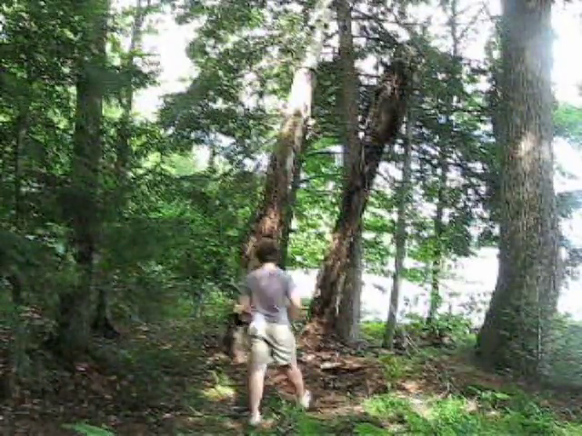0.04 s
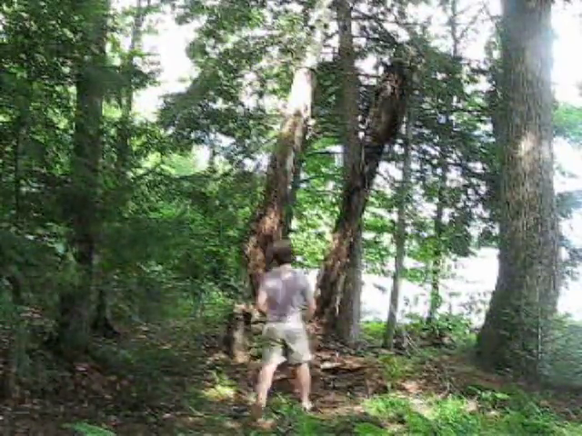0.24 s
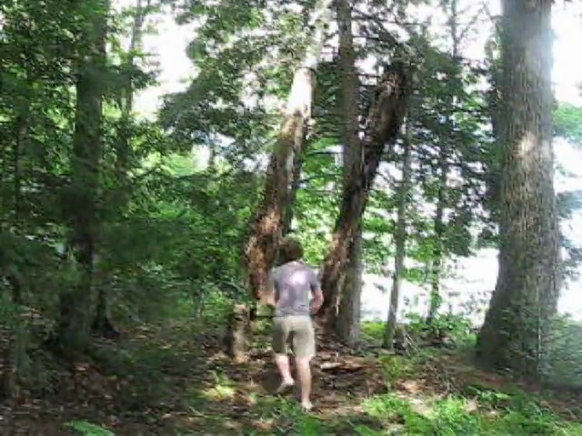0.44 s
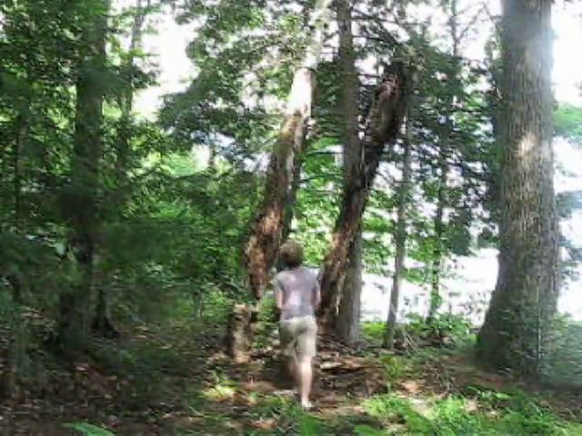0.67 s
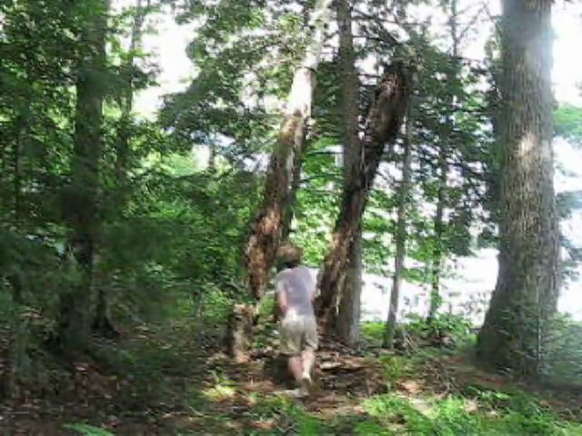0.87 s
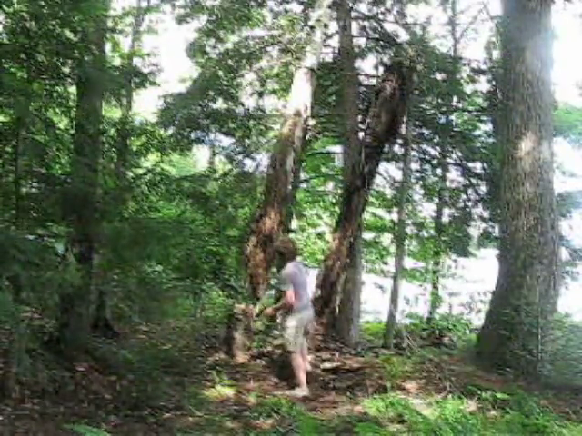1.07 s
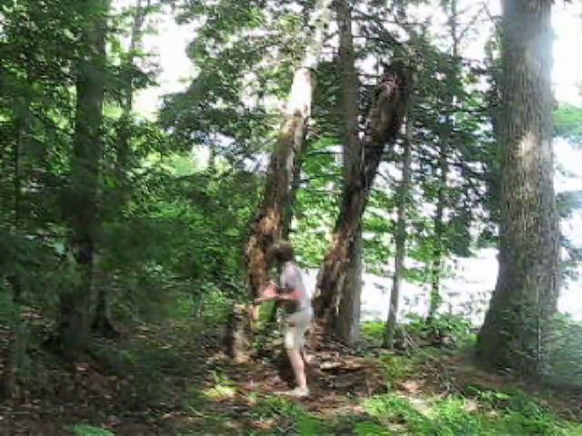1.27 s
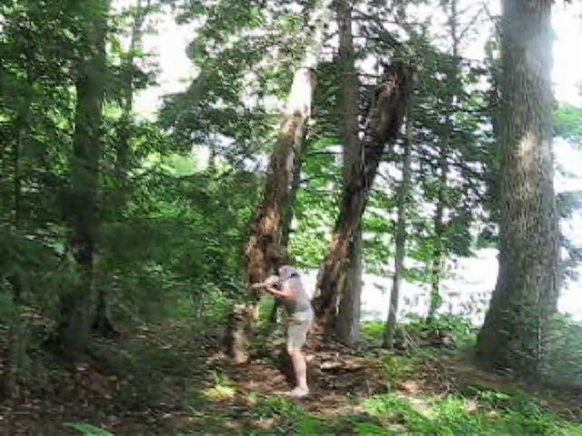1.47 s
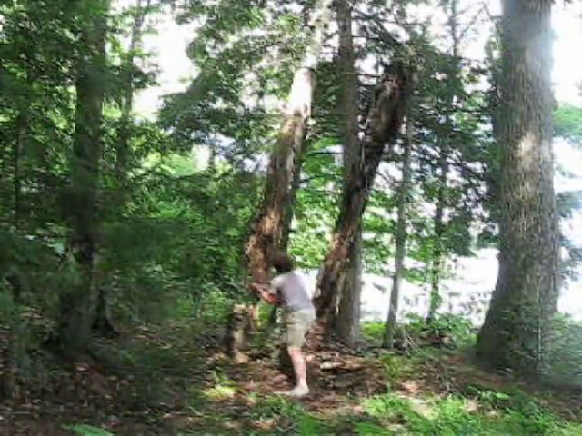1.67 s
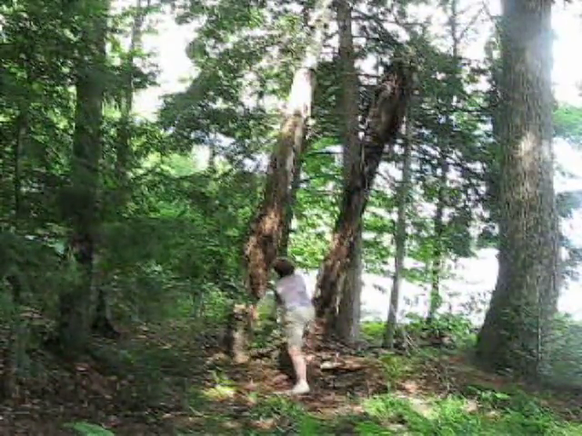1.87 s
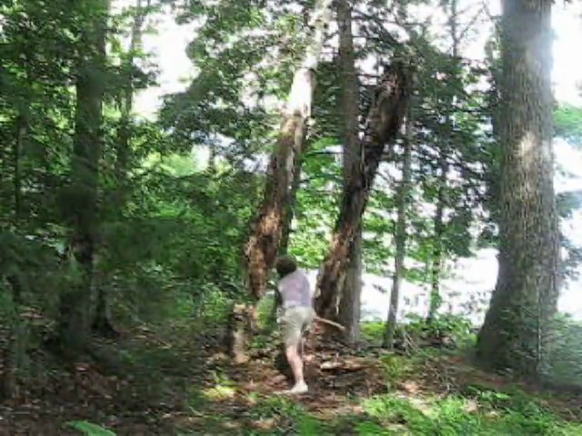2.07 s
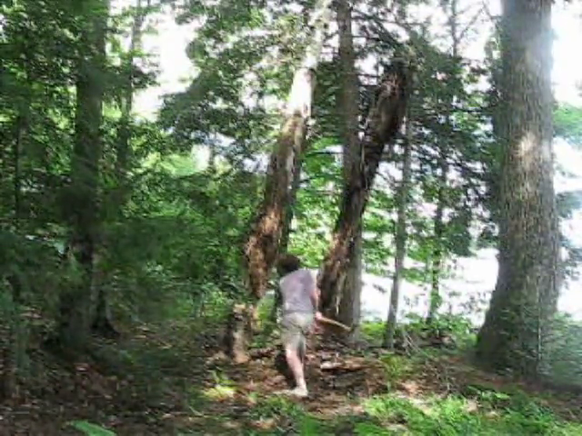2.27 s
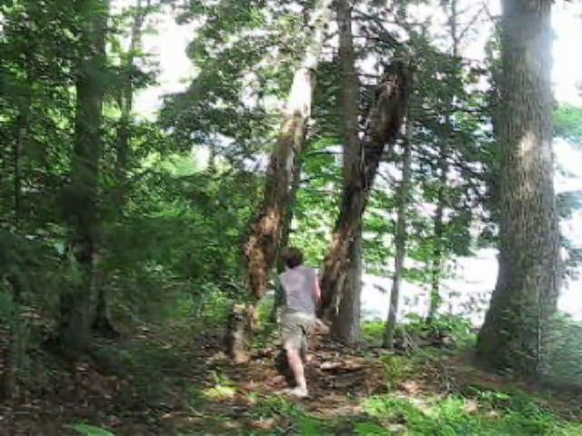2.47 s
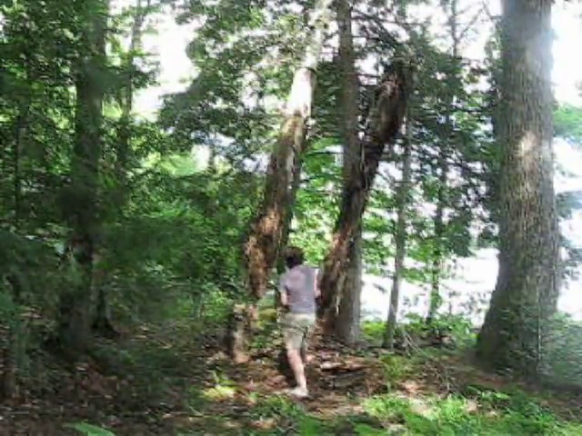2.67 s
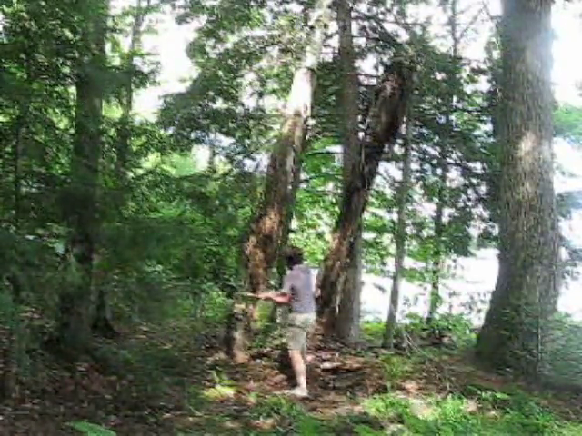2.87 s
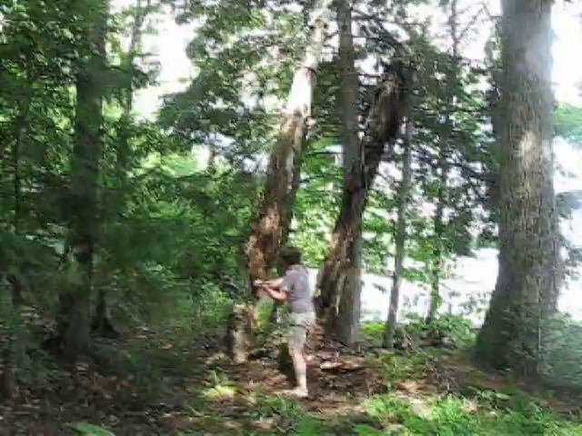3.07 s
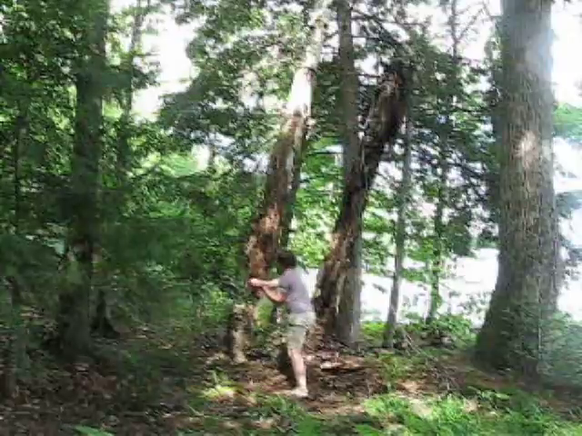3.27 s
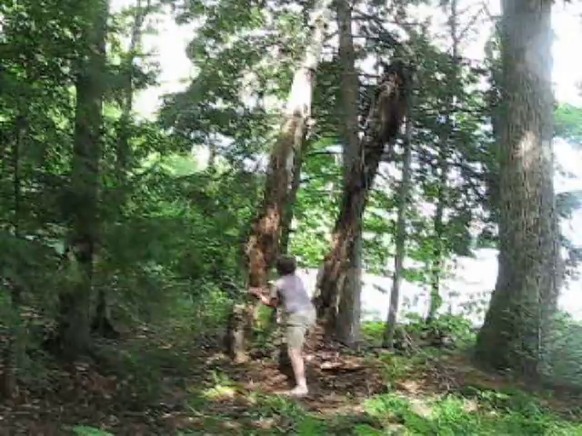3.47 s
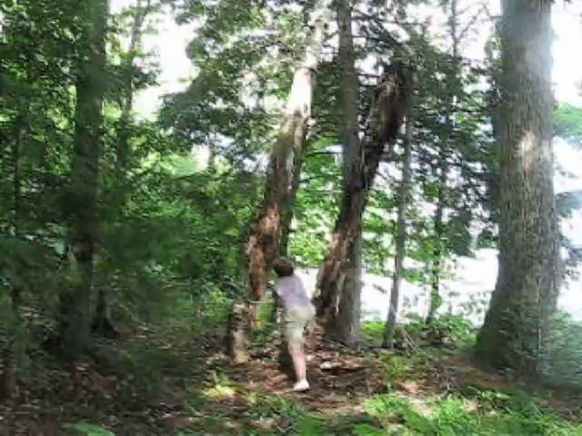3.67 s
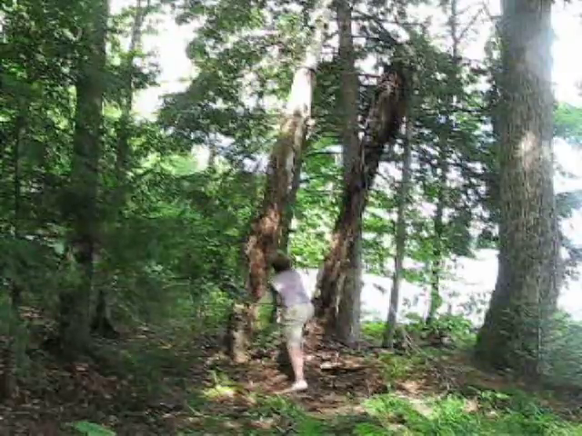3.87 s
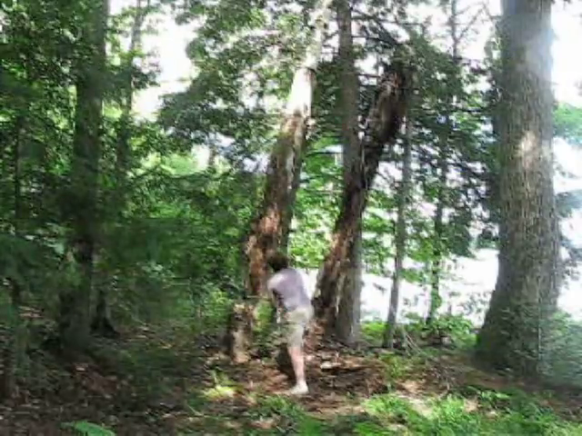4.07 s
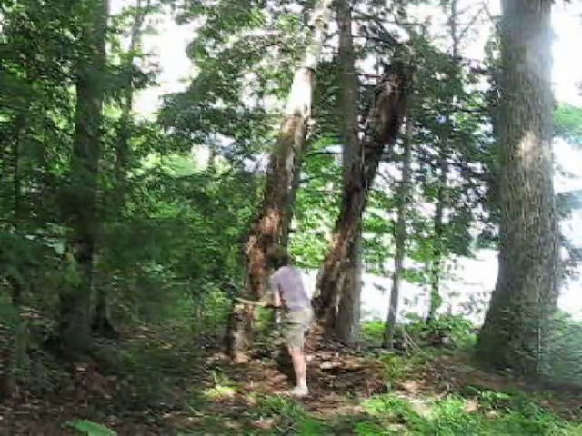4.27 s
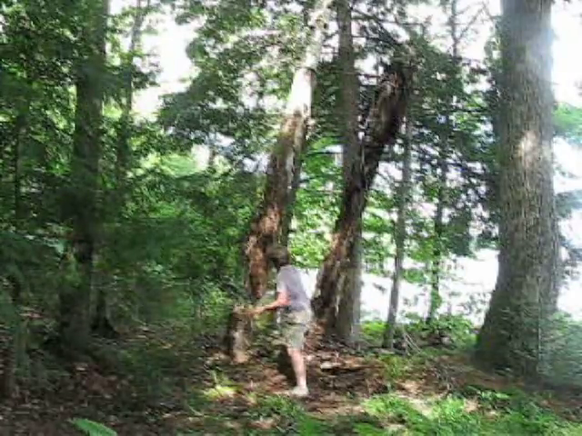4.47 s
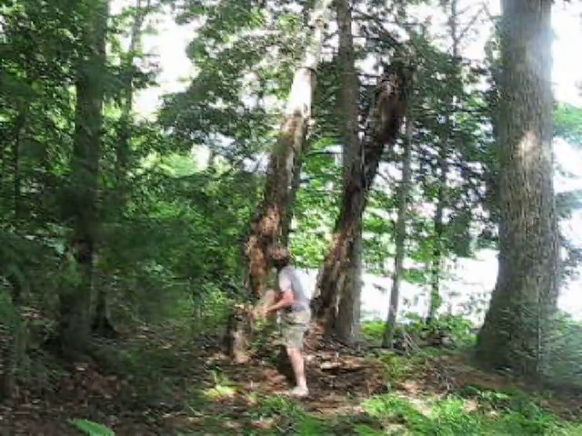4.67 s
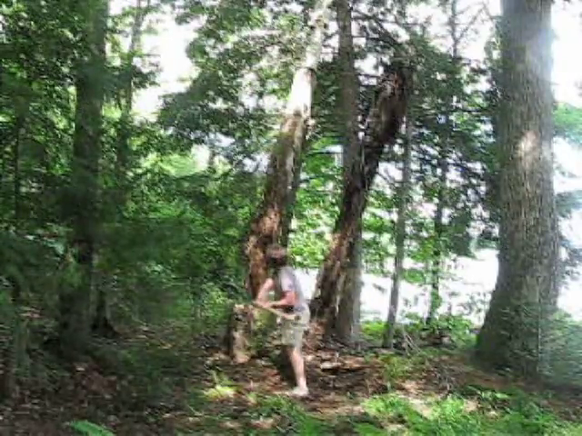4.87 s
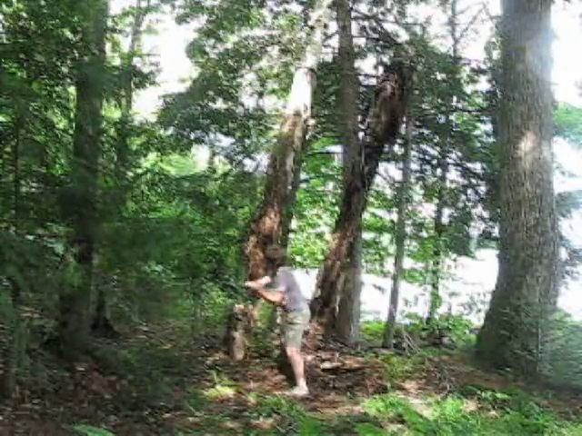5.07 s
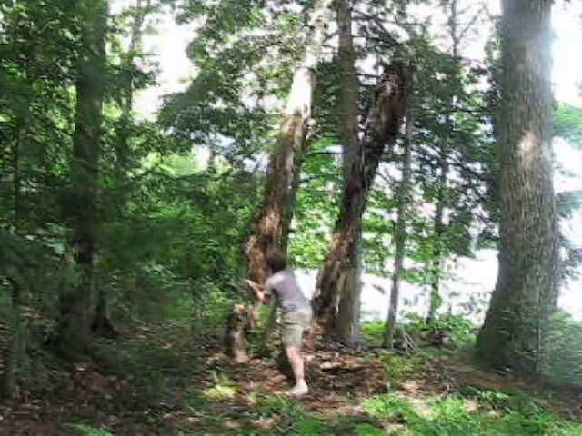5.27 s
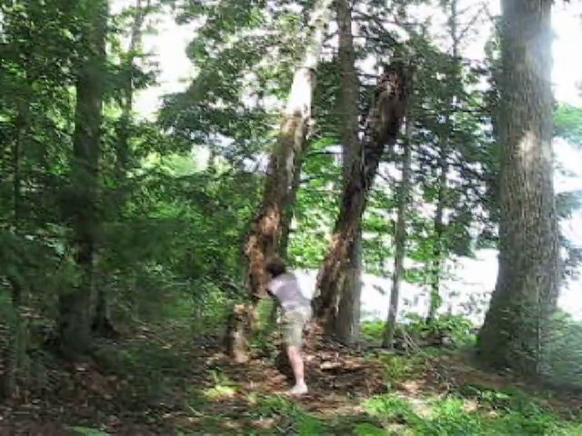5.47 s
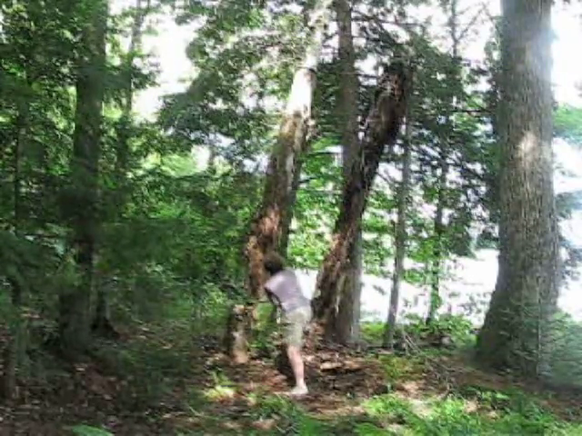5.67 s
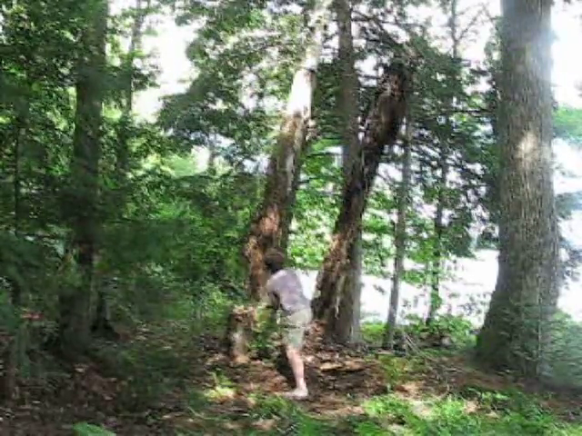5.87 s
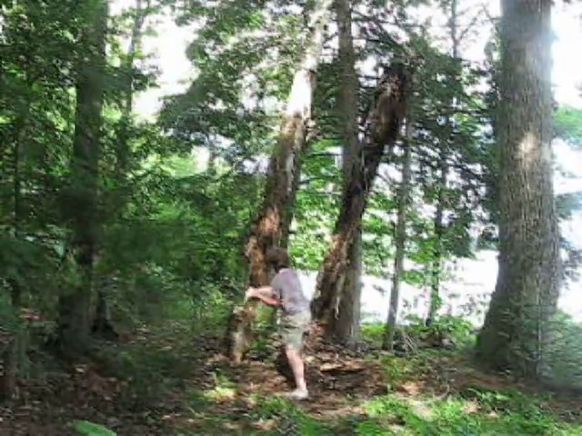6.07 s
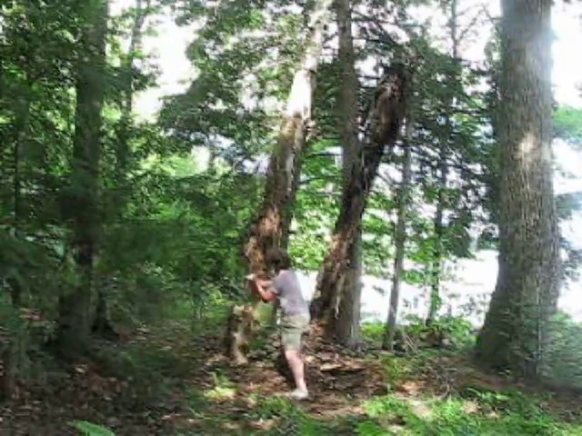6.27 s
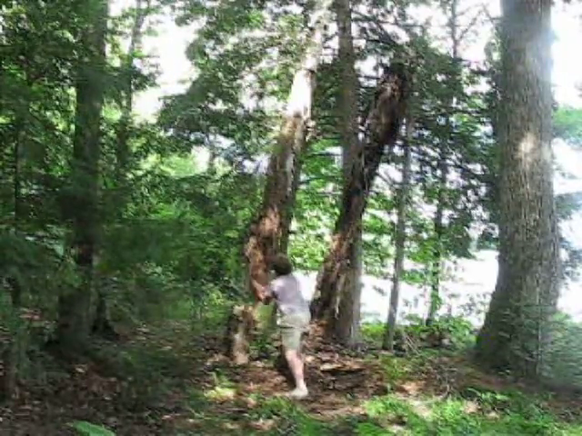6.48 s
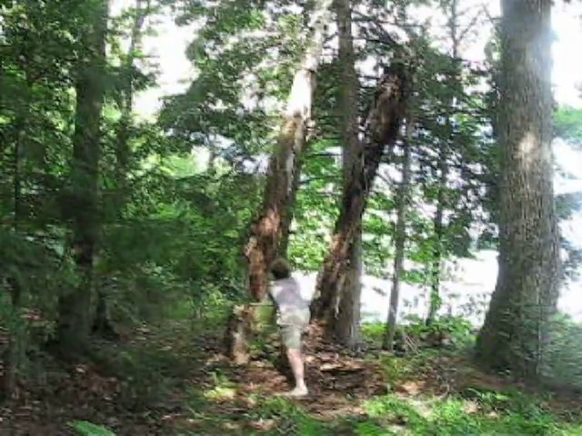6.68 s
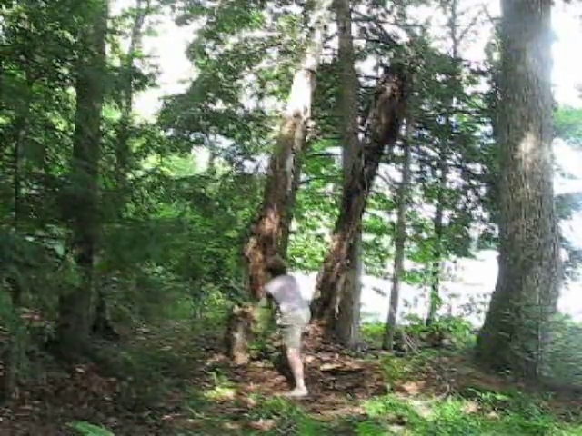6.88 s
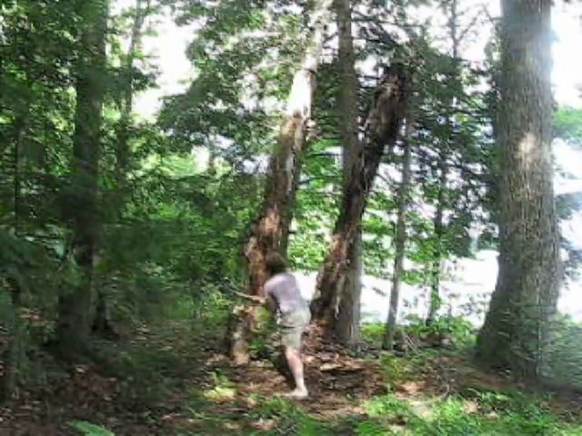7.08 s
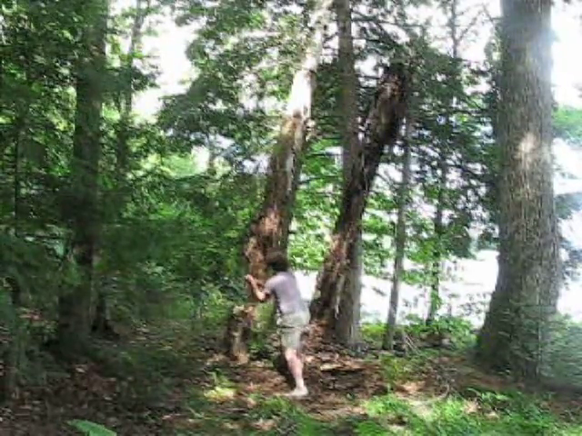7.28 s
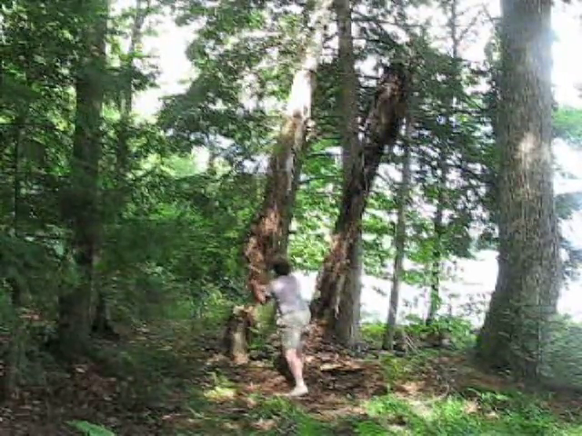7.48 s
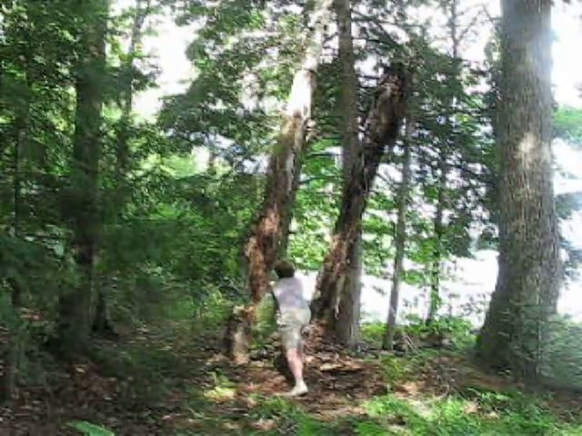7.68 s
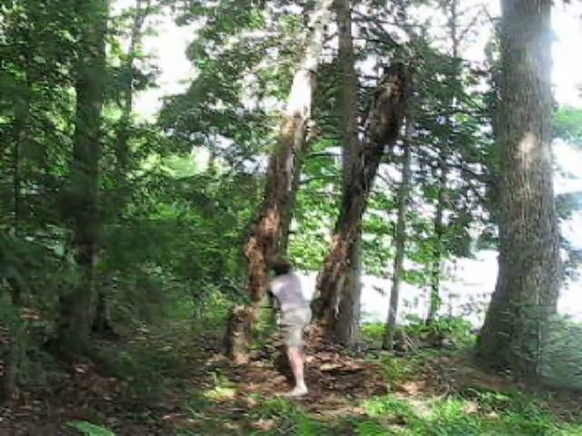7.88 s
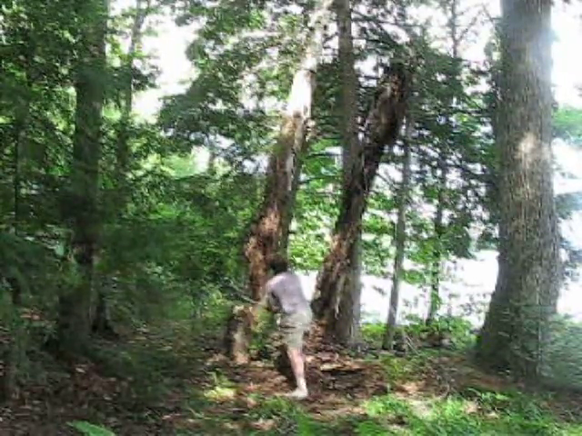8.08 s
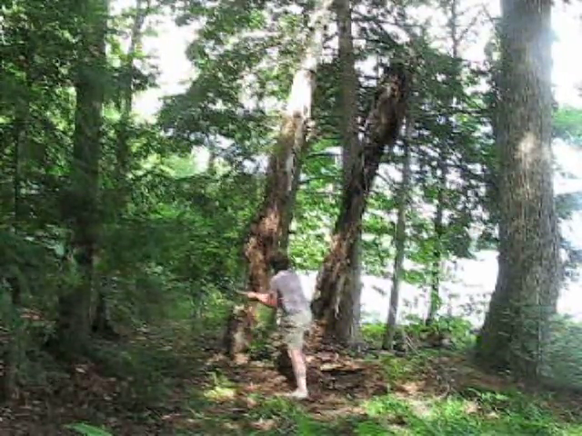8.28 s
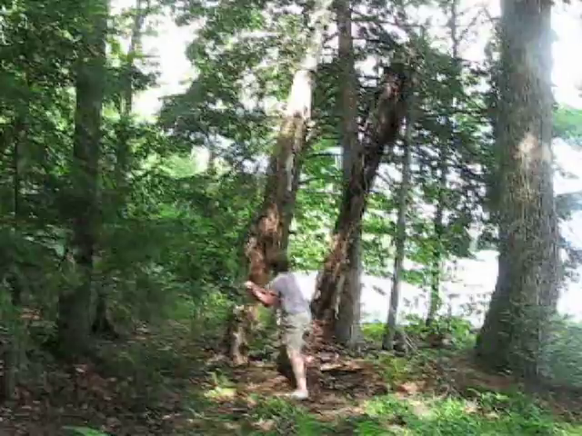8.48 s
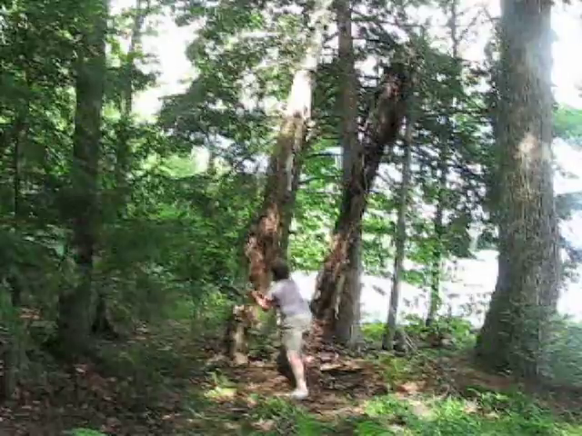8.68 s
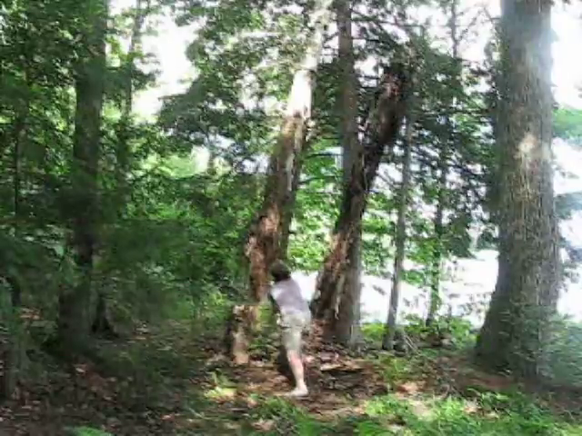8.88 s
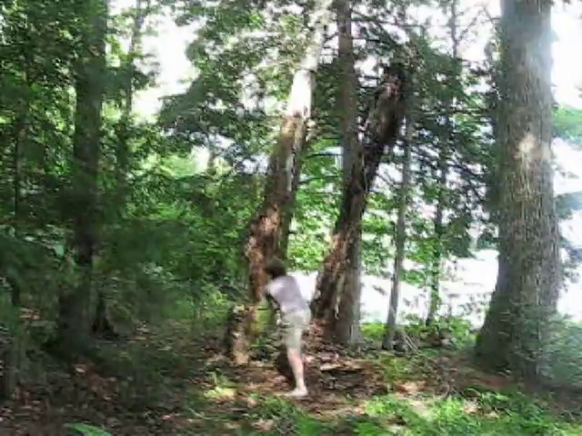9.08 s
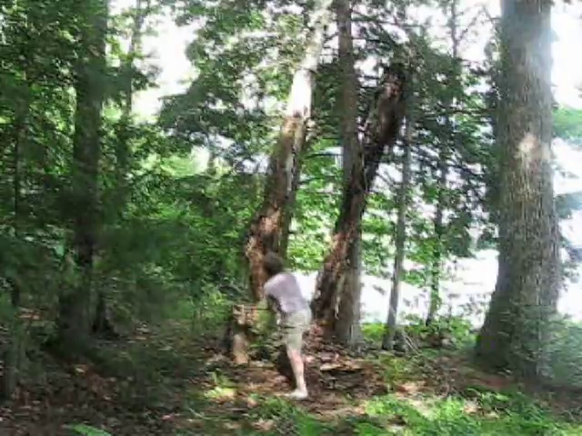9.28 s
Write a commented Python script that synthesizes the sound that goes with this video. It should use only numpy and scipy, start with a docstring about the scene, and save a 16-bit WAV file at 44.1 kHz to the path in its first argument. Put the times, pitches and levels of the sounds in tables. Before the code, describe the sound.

Outdoors in a wood, an axe strikes a rotten trunk some metres from the microphone. After nearly two seconds of leaf rustle, a small footstep crunch and a bird phrase, six dry cracks follow, each with a hollow knock and short woodland echo. Crumbs patter down after each blow, twigs tick, and low wind bumps the microphone.

```python
"""Six axe blows into a rotten birch trunk, some metres away in a wood: each bite is a filtered burst of
fibre snaps with decaying sines for splinter, knock and trunk. The wood echoes as decaying noise, whose
tail swells as the recorder's gain recovers. Crumbs, twigs and feet are short resonant bursts; leaves and
undergrowth rustle as shaped noise. A small bird repeats a phrase of gliding, quavering sines, and wind
rumbles as low noise at the microphone. Both output channels are the same."""
import sys
import numpy as np
from scipy import signal
from scipy.fft import rfft, irfft, next_fast_len
from scipy.io import wavfile
from scipy.ndimage import uniform_filter1d

SR = 44100
rng = np.random.default_rng(int(sys.argv[2]) if len(sys.argv) > 2 else 0)


def int16_out(signal):
    """Quantize to a 16-bit WAV file."""
    q = np.round(np.clip(np.atleast_2d(signal).T, -1, 1) * 32767)
    wavfile.write(sys.argv[1], SR, q.astype(np.int16))


N = 411894
TIME = np.arange(N) / SR

# Modes of the trunk: (frequency [Hz], relative level [dB], t60 when struck [s])
TRUNK_MODES = [(167, -36, .06), (232, -13, 0.079), (283, -12, 0.12), (418, -8, 0.02), (595, -15, 0.1),
               (748, -11.5, 0.035), (925, -34.5, 0.052), (1382, -18.5, 0.089)]
# Return of each blow from the wood:
# (time [s], echo level [dB], time for the gain to recover [s], bass of the early echo [dB])
BLOWS = [(1.874, -24, 0.07, -8.5), (3.672, -22.5, 0.077, 0), (5.498, -23.5, 0.082, -1),
         (6.670, -23, 0.041, 6), (7.704, -24, 0.047, 3), (8.888, -20, 0.067, -4.5)]


def from_db(db):
    """Level to amplitude: 20 dB is a factor of ten."""
    return 10 ** (np.asarray(db) / 20)


def rms_one(x):
    """Normalisation to unit mean power."""
    return x / np.sqrt(np.mean(x ** 2) + 1e-20)


def at_hz(points, hz):
    """Spectral interpolation: levels run straight along a logarithmic frequency axis."""
    points = np.array(points)
    return np.interp(np.log(hz), np.log(points[:, 0]), points[:, 1])


def in_time(rows):
    """Linear interpolation of each column of a time curve, sample by sample."""
    s, *columns = np.transpose(rows)
    return [np.interp(TIME, s, column) for column in columns]


def add(out, s, x):
    """Superposition: mix x into out from time s on; what falls outside is lost."""
    at = round(s * SR) + np.arange(len(x))
    inside = (at >= 0) & (at < N)
    out[at[inside]] += x[inside]


def coloured(x, spectrum, tilt_db=0):
    """Minimum-phase filtering: folding the cepstrum makes the given spectrum causal."""
    size = next_fast_len(len(x) // 2 + 1) * 2
    hz = np.maximum(np.fft.rfftfreq(size, 1 / SR), 1)
    # the tilt, in dB per octave, pivots at 2 kHz and levels off below 500 Hz
    octaves = np.log2(np.maximum(hz, 500) / 2000)
    gain = from_db(at_hz(spectrum, hz) + tilt_db * octaves)
    cepstrum = irfft(np.log(gain))
    cepstrum[1:size // 2] *= 2
    cepstrum[size // 2 + 1:] = 0
    response = np.exp(rfft(cepstrum))
    return irfft(rfft(x, size) * response)[:len(x)]


def resonance(x, hz, width_hz):
    """Second-order resonance: a pole pair whose radius sets the bandwidth, with gain 1 at the peak."""
    r = np.exp(-np.pi * width_hz / SR)
    zeros = np.array([1, 0, -1]) * (1 - r * r) / 2
    poles = [1, -2 * r * np.cos(2 * np.pi * hz / SR), r * r]
    return signal.lfilter(zeros, poles, x)


def split(x, hz):
    """Crossover: second-order Butterworth filters give the parts below and above a frequency."""
    return [signal.sosfilt(signal.butter(2, hz, kind, fs=SR, output="sos"), x)
            for kind in ("low", "high")]


def grainy(size, grain_db=2):
    """Amplitude-modulated noise: the level jumps at random every 32 samples."""
    grains = np.repeat(rng.standard_normal(size // 32 + 1), 32)[:size]
    return rms_one(rng.standard_normal(size) * from_db(grain_db * grains))


def ring(t, hz, t60):
    """Damped free vibration of a struck mode; the surface first moves inwards."""
    return -np.sin(2 * np.pi * hz * t) * from_db(-60 * t / t60)


def flutter():
    """Slow random modulation: straight lines between Gaussian values, twenty a second."""
    knots = TIME[::SR // 20]
    return np.interp(TIME, knots, rng.standard_normal(len(knots)))


def wind(breeze_db=-1, gust_gain=1.31, calm_gain=0.27, lumps_db=2.5):
    """Turbulence at the microphone: low noise whose upper part follows the gusts more than the deep part."""
    # Spectrum of the rumble: (frequency [Hz], density [dB per Hz])
    rumble_colour = [(15, -20), (30, -2.5), (55, -2), (90, 0), (140, -6), (200, -12.5), (300, -25),
                     (600, -43), (2000, -82)]
    # Course of the breeze, whose swings the two gains scale: (time [s], level [dB])
    breeze = [(0.0, -41.5), (0.13, -53), (0.8, -44.5), (0.96, -58), (2.0, -40.5), (2.18, -61.5),
              (2.47, -43), (2.52, -52), (3.17, -44), (3.33, -68), (3.54, -42), (4.66, -46), (4.71, -33.5),
              (4.81, -48.5), (5.62, -43), (6.47, -52), (6.74, -40.5), (6.92, -57), (7.93, -42), (8.17, -55),
              (8.22, -42), (9.34, -45.5)]
    # Sharper buffets: (time of peak [s], peak level [dB], time from peak to 1/e [s])
    buffets = [(0.707, -42, 0.017), (1.793, -33, 0.015), (3.119, -42, 0.05), (4.26, -31, 0.036),
               (4.708, -28.5, 0.014), (7.907, -35, 0.016), (8.248, -36, 0.045)]
    # Spectrum of a buffet: (frequency [Hz], density [dB per Hz])
    buffet_colour = [(20, -26), (60, -0.5), (120, 6.5), (200, -3), (300, -11), (500, -25), (2000, -76)]

    level_db, = in_time(breeze)
    mean_db = level_db.mean()
    gust_db = level_db - mean_db
    rumble = rms_one(coloured(rng.standard_normal(N), rumble_colour))
    deep, upper = split(rumble, 45.0)
    steady = deep * from_db(calm_gain * gust_db)
    lumpy = upper * from_db(gust_gain * gust_db + lumps_db * flutter())
    out = from_db(mean_db + breeze_db) * (steady - lumpy)

    t = TIME[:SR] - 1 / 2
    for s, db, half in buffets:
        push = np.exp(-(t / half) ** 2)
        eddy = rms_one(coloured(rng.standard_normal(SR) * push, buffet_colour))
        add(out, s - 1 / 2, from_db(db) * eddy * np.sqrt(np.mean(push ** 2)))
    return out


def leaves(rustle_db=1, hiss_db=0, flutter_db=0.97):
    """Incoherent sum of many small contacts: a fluttering rush of foliage and a finer hiss above it."""
    # Spectrum of the foliage: (frequency [Hz], density [dB per Hz])
    foliage_colour = [(180, -31), (300, -3), (354, -4.5), (624, -1), (749, 0), (814, -0.5), (2650, -3),
                      (3520, -3.5), (4590, -3.5), (6740, -4.5), (13800, -7.5), (16000, -21.5)]
    # Leaves and undergrowth, before the offsets rustle_db and hiss_db:
    # (time [s], rustle level [dB], fine hiss level [dB])
    rustle = [(0.0, -52, -54), (0.31, -53, -55.5), (1.95, -51, -54.5), (3.59, -53.5, -54.5),
              (3.9, -47, -53.5), (4.71, -53, -53), (5.49, -54.5, -50), (5.65, -49, -55),
              (6.06, -50.5, -51.5), (9.34, -49.5, -49.5)]

    rush_db, fine_db = in_time(rustle)
    rush, _ = split(coloured(grainy(N, grain_db=1), foliage_colour), 3420)
    _, fine = split(coloured(grainy(N, grain_db=1.5), foliage_colour), 3240)
    rush_gain = from_db(rush_db + rustle_db + flutter_db * flutter())
    return rush_gain * rms_one(rush) + from_db(fine_db + hiss_db) * rms_one(fine)


def whistle(length, start_hz, end_hz, waver):
    """Frequency modulation: a gliding sine with a fast, uneven quaver."""
    size = int(length * SR)
    wobble = rms_one(uniform_filter1d(rng.standard_normal(SR // 4), size=70))[:size]
    hz = np.linspace(start_hz, end_hz, size) * (1 + waver * wobble)
    phase = 2 * np.pi * np.cumsum(hz) / SR
    return signal.windows.tukey(size, .5) * np.sin(phase)


def birds(waver=0.0333, echo_t60=0.47, direct_db=-5, echo_db=-2):
    """Scattering by foliage: convolution with decaying noise blurs a buzzy phrase of falling notes."""
    # Repeats of the phrase, before the direct and echo gains:
    # (time [s], level [dB], loss for each octave a note starts above the first [dB])
    phrases = [(.772, -41.5, 12), (4.962, -43, 45), (6.86, -42.5, 33)]
    # Falling notes: (delay [s], start frequency [Hz], end frequency [Hz], relative level [dB])
    notes = [(0, 3940, 3080, 0), (-.012, 2880, 2720, -7.5), (.088, 4330, 3860, 0), (.14, 5450, 4800, 1.5)]

    note_s = .08
    song, lead_hz = np.zeros(N), notes[0][1]
    for s, db, fade_db in phrases:
        for delay, start_hz, end_hz, note_db in notes:
            octaves = max(np.log2(start_hz / lead_hz), 0)
            note = whistle(note_s, start_hz, end_hz, waver)
            add(song, s + delay, from_db(db + note_db - octaves * fade_db) * note)
    t = TIME[:SR // 2]
    foliage = rng.standard_normal(SR // 2) * from_db(-60 * t / echo_t60)
    blurred = signal.fftconvolve(song, foliage / np.linalg.norm(foliage))[:N]
    return from_db(direct_db) * song + from_db(echo_db) * blurred


def swishes(relative_width=0.88, grain_db=2.0):
    """Friction noise: dry leaves brush against each other, and debris slides down after a blow, in a broad band
    under a Gaussian envelope."""
    # Soft swishes in the undergrowth, and at 4.24 s debris falling after the second blow: (time of peak [s],
    # peak level [dB], standard deviation of the envelope [s], pitch [Hz])
    brushes = [(.944, -49, 0.067, 10000), (1.496, -49.5, .057, 7500), (1.49, -48.5, 0.045, 1800),
               (2.757, -55, .044, 7000), (4.241, -49, .15, 1450), (6.113, -46.5, 0.024, 7000),
               (8.603, -50, 0.045, 2500)]

    out, t = np.zeros(N), TIME[:SR] - 1 / 2
    for s, db, half, hz in brushes:
        brush = rms_one(resonance(grainy(SR, grain_db), hz, hz * relative_width))
        add(out, s - 1 / 2, brush * from_db(db) * np.exp(-(t / half) ** 2 / 2))
    return out


def crunches(rows, relative_width):
    """Damped band noise: random impulses through two equal resonances give short dry snaps and crunches."""
    out, t = np.zeros(N), TIME[:SR // 4]
    for s, db, hz, t60 in rows:
        width = hz * relative_width
        snaps = rng.choice([-1, 1], len(t))
        crunch = rms_one(resonance(resonance(snaps, hz, width), hz, width))
        add(out, s, crunch * from_db(db - 60 * t / t60))
    return out


def twigs(spread_db=4, lowest_hz=1500, highest_hz=12000):
    """Brittle fracture: feet crunch, twigs tick, and ticks of random level and pitch come at random times."""
    # Feet shift in the litter: (time [s], initial level [dB], pitch [Hz], t60 [s])
    footfalls = [(.799, -34.5, 1090, .022), (1.169, -38.5, 417, 0.077), (1.171, -42.5, 1150, .16),
                 (8.27, -43, 2480, .06)]
    # Dry twigs tick: (time [s], initial level [dB], pitch [Hz])
    twig_ticks = [(2.488, -38.5, 7000), (3.047, -42, 13500), (4.938, -41, 6700), (5.21, -35, 9900),
                  (7.317, -30.5, 6800), (7.461, -33.5, 6900), (7.969, -37, 11000)]

    ticks_per_s, tick_db, tick_t60 = 5, -48, 0.016
    faint = []
    for when, size, pitch in rng.random((round(ticks_per_s * N / SR), 3)):
        level_db = tick_db + spread_db * (2 * size - 1)
        hz = lowest_hz * (highest_hz / lowest_hz) ** pitch
        faint.append((when * N / SR, level_db, hz))
    ticks = [(s, db, hz, tick_t60) for s, db, hz in twig_ticks + faint]
    return crunches(footfalls, relative_width=0.84) + crunches(ticks, relative_width=0.33)


def crumbs(crumb_db=-46, spread_db=4, fall_s=0.27, crumb_t60=0.013, count=12):
    """Random impacts: crumbs of rotten wood patter into the litter at gamma-distributed delays."""
    out, t = np.zeros(N), TIME[:SR // 20]
    for s, *_ in BLOWS:
        delays = rng.gamma(2, fall_s / 2, count)   # fall_s is the mean
        sizes = rng.uniform(-1.3, 1, count)
        pitches = rng.random(count)
        for delay, size, pitch in zip(delays, sizes, pitches):
            hz = 900 * 2 ** (3 * pitch)   # within three octaves above 900 Hz
            tick = rms_one(resonance(rng.standard_normal(len(t)), hz, hz / 2))
            add(out, s + delay, tick * from_db(crumb_db + spread_db * size - 60 * t / crumb_t60))
    return out


def woody(x, mode_db=10, width_hz=40):
    """Modal colouring: resonances at the trunk modes let the echoes carry its ring."""
    modes = sum(from_db(mode_db + db) * resonance(x, hz, width_hz) for hz, db, _ in TRUNK_MODES)
    return rms_one(x + modes)


def forest(early_t60=0.31, far_db=-20, far_t60=2.03, build=1.16):
    """Reverberation: ground and near stems answer at once; then the recorder's gain recovers
    after the loud crack, so the tail swells, with the far wood behind."""
    # Spectra of the early echo and of the tail: (frequency [Hz], density [dB per Hz])
    early_colour = [(60, -12.5), (150, 2), (280, -4), (450, 0), (800, -3), (1300, -5.5), (3500, -7.5),
                    (6000, -13.5), (12000, -16.5), (16000, -33)]
    tail_colour = [(60, 1), (200, 6), (500, 3.5), (1200, -1.5), (2000, 0.5), (4000, -1), (6000, -4.5),
                   (12000, -9.5), (16000, -22)]
    # Ring time of the wood: (frequency [Hz], t60 [s])
    wood_t60 = [(150, 0.11), (500, 0.49), (2000, 0.4), (5000, 0.46), (14000, 0.44)]

    tail_db = -6   # against the early echo
    out, t = np.zeros(N), TIME[:SR]
    centres, t60s = np.transpose(wood_t60)
    for s, early_db, recovery_s, bass_db in BLOWS:
        near = woody(coloured(grainy(SR, grain_db=0.5), early_colour))
        bass_shelf = [(450, bass_db), (1000, 0)]
        early = coloured(near, bass_shelf) * from_db(early_db - 60 * t / early_t60)

        late = rfft(woody(coloured(grainy(SR, grain_db=2.0), tail_colour), mode_db=6.5))
        log_hz = np.log(np.arange(len(late)) + 1)   # bins of one second of sound lie 1 Hz apart
        past = np.maximum(t - recovery_s, 0)
        far_decay = from_db(far_db - 60 * past / far_t60)
        tail = np.zeros(SR)
        # overlapping bands, each dying at its own rate
        for share, t60 in zip(np.eye(len(t60s)), t60s):
            band = irfft(late * np.interp(log_hz, np.log(centres), share), SR)
            tail += band * (from_db(-60 * past / t60) + far_decay)
        recovery = np.minimum(t / recovery_s, 1) ** build
        echo = early + from_db(early_db + tail_db) * recovery * tail
        add(out, s, echo * (1 - np.exp(-t / 0.0017)))   # soft onset
    return out


def axe(crumble_t60=0.008, knock_cycles=17, splinter_cycles=16, mode_spread_db=1.0):
    """Fracture and modal ringing: fibres snap as the blade bites, a splinter pings, cut and trunk resound."""
    # Breaks of the wood, one or several a blow: (time [s], crack level [dB], length of bite [s],
    # treble tilt [dB per octave], splinter pitch [Hz], knock pitch [Hz], trunk thud level [dB])
    cracks = [(1.8730, -15.5, .0014, 6.5, 5840, 1340, -45), (1.8754, -14.5, 0.002, 2, 1930, 910, -23),
              (3.6643, -13.5, .004, 2.5, 1840, 744, -34), (3.6834, -14.5, 0.0019, 1, 2740, 460, -9.5),
              (5.491, -21, .002, 2, 2490, 1160, -38), (5.493, -16.5, 0.0015, 4.5, 4400, 824, -40),
              (5.4969, -14, 0.0015, 4.5, 1750, 410, -13.5), (5.542, -19.5, 0.00066, 0.5, 2720, 1530, -42),
              (5.5595, -25.5, 0.0013, 2, 1880, 1180, -40), (5.6102, -25, 0.00415, 1, 2300, 940, -40),
              (6.668, -13.5, 0.0025, 2, 3500, 427, -9.5), (7.703, -8.5, 0.00092, 1.5, 3900, 780, -10),
              (8.8786, -17, .0015, 5.5, 2160, 1000, -47), (8.887, -10.5, .0027, 1, 4100, 580, -13)]
    # Spectrum of the snapping fibres: (frequency [Hz], density [dB per Hz])
    crack_colour = [(40, -42), (150, -10.5), (600, 10.5), (1200, 1), (2000, 0.5), (3800, -2), (5200, -11.5),
                    (8000, -10.5), (12000, -16), (16000, -19.5)]

    splinter_db, knock_db = 7, -4   # against the crack that sets them off
    out, t = np.zeros(N), TIME[:SR // 4]
    for s, crack_db, length, tilt_db, splinter_hz, knock_hz, thud_db in cracks:
        bite = from_db(-60 * np.maximum(t - length, 0) / crumble_t60)
        snaps = coloured(rng.choice([-1, 1], len(t)) * bite, crack_colour, tilt_db)
        crack = from_db(crack_db) * rms_one(snaps) * np.sqrt(np.mean(bite ** 2))
        # the t60 of splinter and knock spans a set number of cycles
        splinter = ring(t, splinter_hz, splinter_cycles / splinter_hz)
        knock = ring(t, knock_hz, knock_cycles / knock_hz)
        thud = np.zeros(len(t))
        for hz, db, t60 in TRUNK_MODES:
            mode_db = thud_db + db + mode_spread_db * rng.standard_normal()
            thud += from_db(mode_db) * ring(t, hz, t60)
        add(out, s, crack + from_db(crack_db + knock_db) * knock + thud)
        # the splinter gives way halfway through the bite
        add(out, s + length / 2, from_db(crack_db + splinter_db) * splinter)
    return out


def scene(trunk_low_hz=105):
    """Superposition at one microphone; the chops and their echoes carry little deep bass."""
    _, chops = split(axe() + forest(), trunk_low_hz)
    mono = chops + crumbs() + twigs() + swishes() + birds() + leaves() + wind()
    return np.tile(mono, (2, 1))


def record(dry, top=0.53, low_cut_hz=34, cutoff_hz=15800):
    """Band limiting and soft saturation: the small microphone loses deep bass, peaks round, the top is cut."""
    _, thinned = split(dry, low_cut_hz)
    rounded = top * np.tanh(thinned / top)
    top_cut = signal.ellip(10, .1, 80, cutoff_hz, fs=SR, output="sos")
    return signal.sosfilt(top_cut, rounded)


dry = scene()
out = record(dry)
int16_out(out)
```